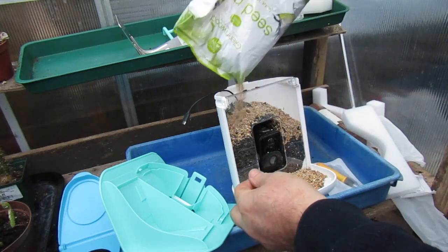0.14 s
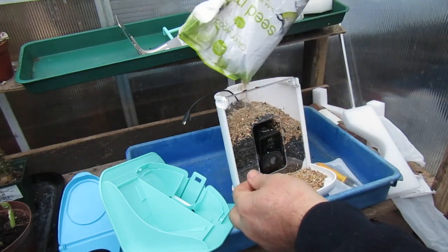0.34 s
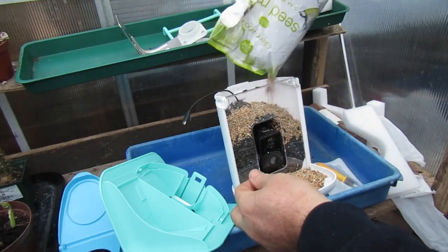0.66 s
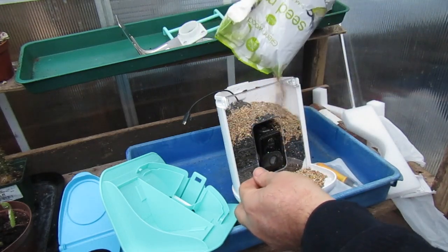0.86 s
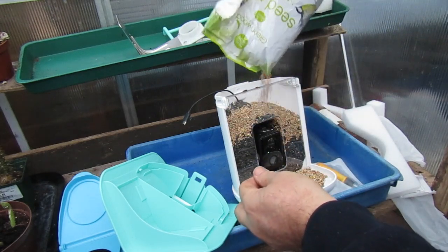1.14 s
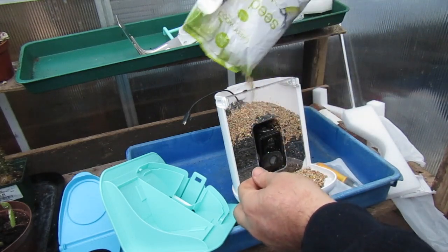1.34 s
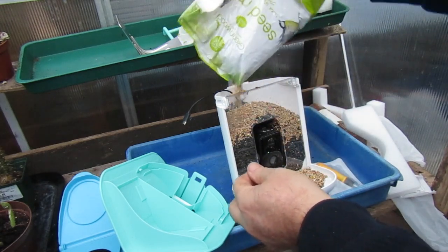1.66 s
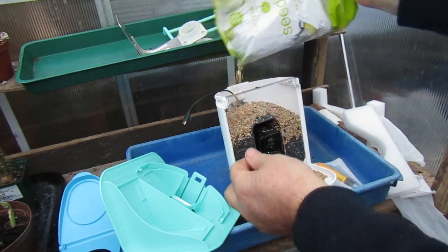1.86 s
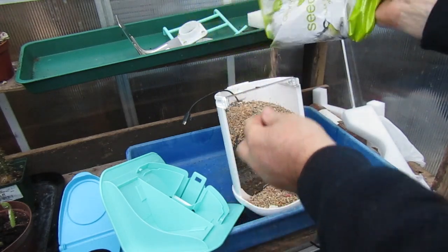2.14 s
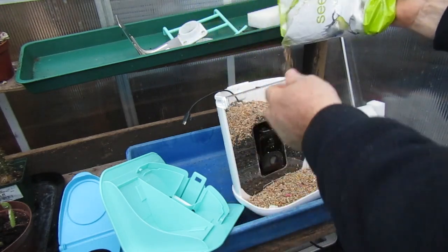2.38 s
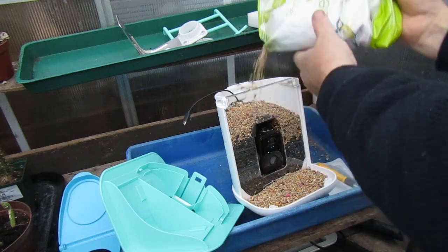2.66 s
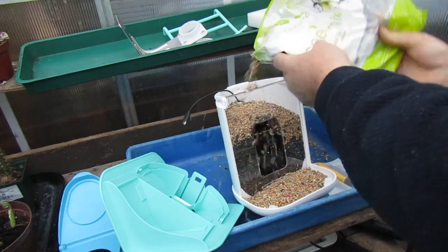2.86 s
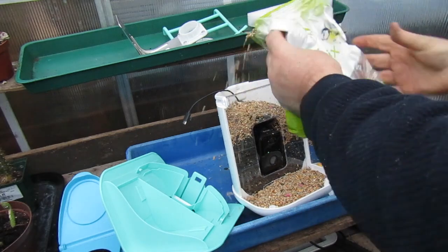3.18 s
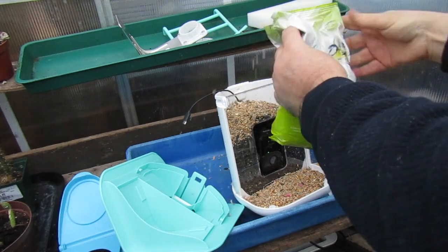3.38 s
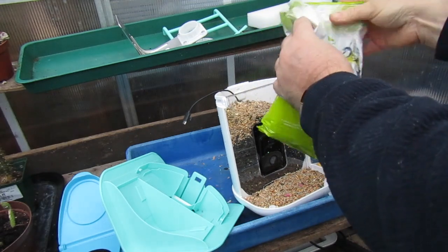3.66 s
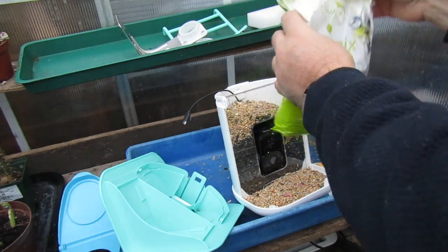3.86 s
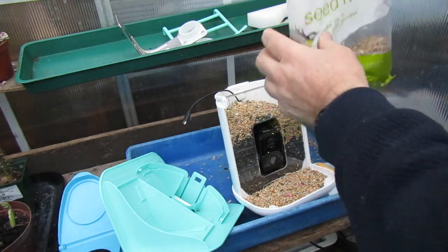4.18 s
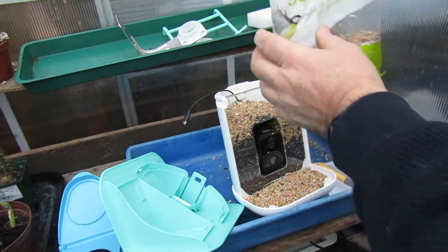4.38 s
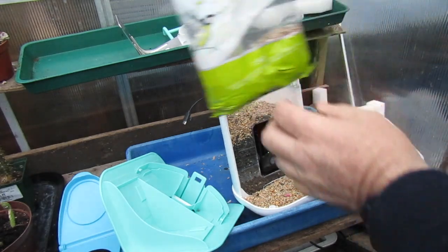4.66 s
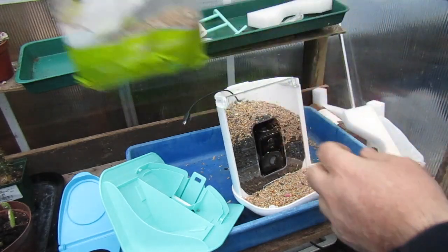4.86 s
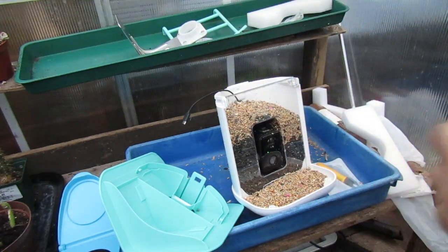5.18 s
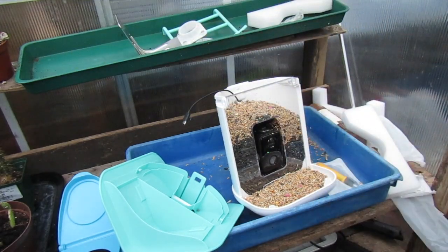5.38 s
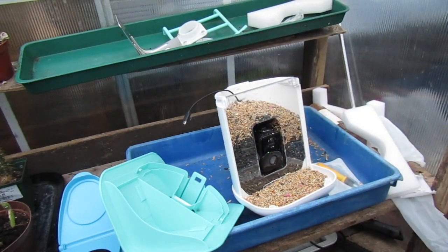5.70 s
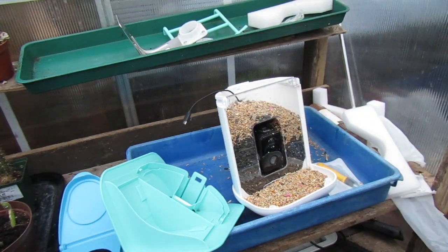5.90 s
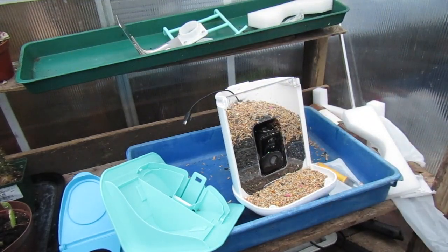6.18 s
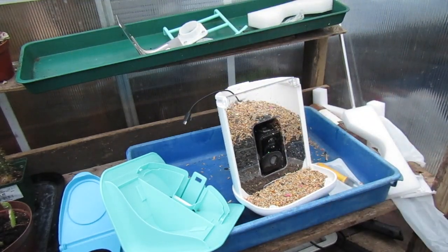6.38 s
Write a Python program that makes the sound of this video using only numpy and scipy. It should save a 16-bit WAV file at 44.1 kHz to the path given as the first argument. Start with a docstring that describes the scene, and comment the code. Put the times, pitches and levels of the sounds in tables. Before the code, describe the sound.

Close, loud plastic bag rustling and dull bumps over a hissing seed pour that stops, leaving scattered crisp film snaps in a greenhouse.

```python
"""Small seeds pour from a plastic bag into a plastic hopper in a greenhouse; then the bag is lifted, squeezed
and carried off. Seeds are dense random grains, clumped and sent through wall and hopper resonances.
The bag film buckles in snaps (click, rebounds, ring) and crunches (bursts of creases in three bands).
Hands and the seed load thump dully as noise pushes ring the walls; a low wavering sine hum swells now and then.
Shaped noise makes the air, and a short, slightly dull tail the greenhouse."""
import sys
import numpy as np
from scipy import signal
from scipy.fft import rfft, irfft, next_fast_len
from scipy.io import wavfile

SR = 44100
rng = np.random.default_rng(int(sys.argv[2]) if len(sys.argv) > 2 else 0)


def inscribe(sig):
    """Save sig as 16-bit PCM at rate SR to the path in sys.argv[1].

    A 1-D sig is mono; a 2-D sig holds one channel per row.
    Samples are clipped to [-1, 1] before scaling.
    """
    pcm = np.round(np.clip(np.atleast_2d(sig).T, -1, 1) * 32767)
    wavfile.write(sys.argv[1], SR, pcm.astype(np.int16))


def boost_factor(decibels):
    """Convert a level in decibels to a linear amplitude factor."""
    exponent = np.asarray(decibels, float) / 20
    return 10 ** exponent


N = 288414

# Spectrum of the air. Each row: frequency in Hz, relative weight in dB.
AIR_SPECTRUM = [(20, -25), (40, 11), (100, 11), (300, 15.5), (1000, -26), (2500, -57), (8000, -76),
                (15000, -16)]
# Hum swells. Each row: start of the hold in seconds, end of the hold in seconds, mean level in dB.
HUM_SWELLS = [(.33, .48, -49), (1.382, 1.87, -48.5), (2.06, 2.42, -51)]
# Wall resonances. Each row: frequency in Hz, width in Hz, relative gain in dB.
WALL_MODES = [(95, 9.6, -13), (176, 23, -1), (325, 190, 3), (400, 72, -8)]
# Dull thumps of hand and load. Each row: start in seconds, peak in dB, pitch in Hz.
THUMPS = [(0.001, -10, 325), (0.387, -14.5, 384), (1.041, -12, 400), (1.07, -18, 314), (1.324, -17.5, 370),
          (1.861, -18, 375), (1.989, -11, 400), (2.421, -17, 502), (2.58, -15.5, 360), (2.795, -12.5, 310),
          (3.132, -20, 413), (4.103, -14.5, 305), (4.119, -14, 507), (4.256, -21, 760), (4.437, -15.5, 567),
          (4.4745, -16, 783), (4.485, -18.5, 975), (5.443, -17, 700), (6.199, -22, 325)]
# Load slumps, bag drums and slackens. One row: start in seconds, nominal level in dB, first mean pitch in Hz,
# last mean pitch in Hz, length in seconds.
SLUMP = (4.484, -22, 390, 290, .12)
# Runs of creases. Each row: start in seconds, grain level in dB, tilt from low to top band in dB, T60 in seconds.
CRUNCHES = [(0.0747, -15, -11, 0.064), (0.157, -10.5, 1, 0.074), (0.255, -12.5, -16, 0.097),
            (0.299, -9.5, -10, 0.13), (0.3884, -12, -5, 0.15), (0.4632, -8.5, -7, 0.068),
            (0.526, -15.5, -9, 0.18), (0.6026, -10.5, -15, 0.054), (0.666, -12, -7, 0.081),
            (0.7473, -11.5, -9, 0.061), (0.8954, -8.5, 7, 0.018), (1.044, -7.5, 1, 0.05),
            (1.144, -16.5, 4, 0.061), (1.194, -9.5, -5, 0.06), (1.242, -20.5, -19, 0.37),
            (1.292, -9, -13, 0.14), (1.3549, -8, -10, 0.052), (1.4195, -13.5, -2, 0.061),
            (1.518, -14, 9, 0.1), (1.864, -4, -13.5, 0.081), (1.894, -7, 19, 0.06),
            (1.9607, -14.5, 18, 0.089), (1.986, -10, -14.5, 0.14), (2.0804, -9, 8, 0.22),
            (2.1313, -4, 17, 0.046), (2.2146, -3, 4, 0.12), (2.234, -6.5, 22, 0.15), (2.252, -8, 16, 0.12),
            (2.452, -11, 33, 0.065), (2.469, -11.5, 38, 0.17), (2.491, -12, 33, 0.093),
            (2.534, -12, 22, 0.11), (2.5605, -6.5, 31, 0.05), (2.586, -8.5, 38, 0.051),
            (2.874, -10, 16, 0.067), (2.889, -9, 16, 0.046), (2.9519, -8, 2, 0.089), (3.049, -7, 19, 0.056),
            (3.195, -9.5, 27, 0.051), (3.216, -4, 5, 0.052), (3.229, -5, 20, 0.031),
            (3.273, -10, 20, 0.037), (3.3027, -9.5, 18, 0.058), (3.352, -15, 32, 0.078),
            (3.488, -12, 7, 0.22), (3.639, -8, 14, 0.027), (3.66, -8, 1, 0.079), (3.891, -9.5, 18, 0.048),
            (3.934, -10, -2, .05), (3.951, -5, 11, 0.04), (3.988, -6.5, 17, 0.054), (4.1, -12, -5, 0.092),
            (4.116, -5.5, -1, 0.083), (4.2, -12, 3, 0.2), (4.601, -20, -17.5, 0.13), (4.694, -19, 0, 0.093),
            (4.764, -16.5, 14, 0.044), (4.847, -17, -15, 0.11), (4.892, -16.5, 0, 0.06),
            (4.9638, -21, -22.5, 0.061), (5.1728, -14, 12, 0.087), (5.442, -8, -8, 0.024),
            (5.8384, -14, -16.5, 0.091), (5.989, -24, 13, 0.028), (6.0127, -17.5, 0, 0.17),
            (6.0559, -9.5, -3, 0.15), (6.163, -8.5, -14, 0.043), (6.1933, -9, -13.5, 0.097),
            (6.2585, -12, -9, 0.038), (6.486, -24.5, -19.5, 0.21)]
# Single sharp buckles. Each row: start in seconds, peak in dB, ring pitch in Hz, ring peak over click peak in dB.
SNAPS = [(1.2965, -4, 2200, 1), (1.4194, -10.5, 3200, 1), (1.864, -9.5, 2820, 2), (1.8947, -4, 1380, -4.5),
         (2.1315, -14, 2560, -11), (2.3077, -7, 1900, 8), (3.4867, -5, 2440, 4), (3.489, -3.5, 4360, 5),
         (3.8958, -4, 5550, -4), (3.989, -3, 4760, -6), (4.1259, 3, 3040, -9), (4.1555, -4, 2010, -11),
         (4.2165, -11, 2940, 0), (4.3337, -8, 3190, -11), (4.4752, -17, 1520, -2),
         (4.6024, -11, 1830, -4.5), (4.6953, -16, 6700, 4), (4.764, -9, 1600, -7), (4.8472, -8, 2830, -22),
         (4.894, -4.5, 3010, -8), (4.9031, 1.5, 5960, -14), (5, -13, 3760, -21), (5.0763, -11.5, 1540, -17),
         (5.1125, -17.5, 2850, 5), (5.163, -7.5, 2860, -10), (5.1814, 1.5, 2010, -7), (5.214, -10, 6170, 1),
         (5.2303, -4, 2980, -5), (5.2747, -8, 5130, -11), (5.302, -8.5, 2420, -4),
         (5.3315, -5.5, 1570, -8.5), (5.3517, 1, 8040, -7), (5.386, -20, 4000, -2),
         (5.3894, -1.5, 3200, -17), (5.3986, -14, 5500, -3), (5.411, 1.5, 6600, -5.5),
         (5.438, -20, 2000, 1), (5.4443, -11, 1540, -2), (5.457, -4, 6960, -7), (5.464, -7, 1500, -8),
         (5.4717, -12, 1550, -20), (5.487, -13, 1380, -6.5), (5.4971, 3, 2640, -17), (5.508, -19, 3000, 6),
         (5.5528, -27, 1400, -5), (5.5688, -1.5, 4400, -8.5), (5.741, -7, 1500, -15),
         (5.823, -17, 1660, -7), (5.841, -6, 1660, -5), (5.8518, -10.5, 1800, -1), (5.8744, 4, 2840, -7),
         (6.0895, -10, 4500, 0), (6.134, -7.5, 2370, -4), (6.2012, -14, 1300, -5),
         (6.2225, 3.5, 3550, -33.5), (6.3065, -18, 2600, 0), (6.328, -9.5, 3680, -1.5),
         (6.3799, -1, 3760, -18), (6.429, -14.5, 1980, -7)]
# Seed stream and rustle. Each row: time in seconds, hollow patter level in dB, treble hiss level in dB.
SEED_FLOW = [(0, -26, -36), (.2, -34, -41.5), (.45, -28, -41), (.64, -33, -42), (.8, -31.5, -26),
             (1.0, -32, -40.5), (1.4, -34, -48), (1.7, -33.5, -34.5), (1.82, -33.5, -42.5),
             (2.1, -26.5, -30.5), (2.3, -31, -20), (2.58, -27.5, -16), (2.7, -34.5, -23),
             (2.87, -27, -22.5), (3.03, -29.5, -20), (3.15, -22, -22), (3.3, -26, -25.5), (3.5, -22.5, -24),
             (3.72, -25.5, -27), (3.85, -20.5, -29), (4.04, -23.5, -24), (4.18, -31.5, -46),
             (4.29, -35, -45), (4.45, -39.5, -47), (4.58, -42.5, -62), (4.9, -39.5, -45), (5.06, -36, -62),
             (5.4, -36, -41.5), (5.55, -42, -74), (5.96, -40.5, -63), (6.1, -33.5, -39), (6.3, -40, -44),
             (6.54, -38, -87)]
# Hopper resonances. Each row: frequency in Hz, width in Hz, relative gain in dB.
HOPPER_MODES = [(674, 230, -30), (1020, 27, 14.5), (1370, 670, 1)]
# Spectrum of the patter. Each row: frequency in Hz, relative weight in dB.
PATTER_SPECTRUM = [(200, -20), (450, -8), (650, 2.5), (1100, -1), (2000, -4.5), (3000, -6), (5000, -15)]
# Spectrum of the hiss. Each row: frequency in Hz, relative weight in dB.
HISS_SPECTRUM = [(3530, -52), (6000, -22.5), (8720, -14), (11900, -15), (15000, -21.5), (16000, -60)]

AIR_DB = -50.5
HUM_HZ, HUM_REST_DB = 48.3, -73
HUM_RISE_DB_PER_S, HUM_FALL_DB_PER_S = 130, 140
ROOM_T60_S, ROOM_DB = 0.089, -18
THUMP_RING_WIDTH_HZ, THUMP_PUSH_S, THUMP_SETTLE_S = 30, 0.0039, 0.010
THUMP_PUFF_DB, THUMP_WALL_DB, THUMP_LOW_DB = 3, 3, -14.5   # against the ring
CRUNCH_LOW_DB, CRUNCH_TOP_DB = -6, -1.5   # grain level against the middle band at no tilt
CRUNCH_LOW_SHARE = 0.7   # share of the tilt taken by the low band
CRUNCH_DENSE_UNTIL_S = 4.3
PATCH_DB, PATCH_PITCH_RATIO, PATCH_LAG_PER_T60 = -5.5, 0.624, 0.18
SNAP_RING_T60_CYCLES = 8
SNAP_CREASE_DB, SNAP_CREASE_T60_S = -17, 0.039   # crease grains against the first click, before the filters
PATTER_REF_DB, HISS_REF_DB = -30, -32
RATTLE_AT_REF_DB, RATTLE_DB_PER_PATTER_DB, RATTLE_DB_PER_HISS_DB = -32.5, 0.55, 0.61
BOOM_AT_REF_DB, BOOM_DB_PER_PATTER_DB, BOOM_SINK_DB_PER_S = -34.5, 0.42, 1.98
HUSK_DB, HUSK_FLURRY_DB, HUSK_Q = 3, 5.5, 8   # against the plain rattle; swing; pitch over width
NOTCH_HZ, NOTCH_WIDTH_HZ = 7900, 260
BASS_HZ, TOP_HZ, EDGE_HZ = 46, 11040, 15000


def rms_one(x):
    """Scales to rms 1."""
    return x / np.sqrt(np.mean(x ** 2) + 1e-20)


def in_time(rows):
    """Interpolates table columns over the scene."""
    s, *columns = np.transpose(rows)
    return [np.interp(np.arange(N) / SR, s, column) for column in columns]


def band(x, low_hz, high_hz, order=2):
    """Butterworth band-pass."""
    edges_hz = [low_hz, min(high_hz, .45 * SR)]
    return signal.sosfilt(signal.butter(order, edges_hz, "band", fs=SR, output="sos"), x)


def colour(x, points):
    """Weights the spectrum by a table of Hz and dB; rms 1."""
    size = next_fast_len(N)
    hz = np.maximum(np.arange(size // 2 + 1) * SR / size, 1)
    table = np.array(points)
    weight_db = np.interp(np.log(hz), np.log(table[:, 0]), table[:, 1])
    return rms_one(irfft(rfft(x, size) * boost_factor(weight_db), size)[:N])


def resonance(x, hz, width_hz):
    """Two-pole resonator with unit gain near its pitch."""
    r = np.exp(-np.pi * width_hz / SR)
    feedback = [1, -2 * r * np.cos(2 * np.pi * hz / SR), r * r]
    return signal.lfilter([(1 - r * r) / 2, 0, (r * r - 1) / 2], feedback, x)


def drift(corner_hz):
    """Noise through two equal low-pass poles, rms 1: a slow random wander."""
    r = np.exp(-2 * np.pi * corner_hz / SR)
    return rms_one(signal.lfilter([1], [1, -2 * r, r * r], rng.standard_normal(N + SR))[SR:])


def grains(per_s, spread_db, size=N):
    """Random clicks of either sign, a few much larger than the rest."""
    sizes = boost_factor(spread_db * np.minimum(rng.exponential(1, size), 5)) * rng.choice([-1, 1], size)
    return sizes * (rng.random(size) < per_s / SR) + 1e-18


def air():
    """Steady shaped noise, strongest in the bass."""
    return boost_factor(AIR_DB) * colour(rng.standard_normal(N), AIR_SPECTRUM)


def hum():
    """A low sine that swells, holds and sinks, wavering in level and pitch."""
    t = np.arange(N) / SR
    level_db = np.full(N, float(HUM_REST_DB))
    for start_s, end_s, hold_db in HUM_SWELLS:
        rise_db = HUM_RISE_DB_PER_S * np.maximum(start_s - t, 0)
        fall_db = HUM_FALL_DB_PER_S * np.maximum(t - end_s, 0)
        level_db = np.maximum(level_db, hold_db - rise_db - fall_db)
    phase = 2 * np.pi * np.cumsum(HUM_HZ * (1 + 0.019 * drift(9.7))) / SR
    return np.sqrt(2) * boost_factor(level_db + drift(6)) * np.sin(phase)


def greenhouse(x):
    """Close hard panes and trays: a dense, quickly dying and slightly dull tail."""
    t = np.arange(SR // 4) / SR
    tail = grains(5000, 0.71, size=len(t)) * boost_factor(-60 * t / ROOM_T60_S) * (t > .0015)
    tail = signal.lfilter([1], [1, -.3], tail)
    return signal.fftconvolve(x, tail / np.sqrt(np.sum(tail ** 2)))[:N]


def noise_push(t, time_s):
    """Noise under a pulse that peaks at time_s."""
    return rng.standard_normal(len(t)) * t * np.exp(-t / time_s)


def slump(t):
    """The drumming bag slackens: a fading sine sinks with unsteady pitch and level."""
    _, level_db, from_hz, to_hz, length_s = SLUMP
    glide_hz = from_hz + (to_hz - from_hz) * t / length_s
    glide_hz = glide_hz * (1 + .14 * drift(90)[:len(t)])
    envelope = np.maximum(1 - t / length_s, 0) ** 2 * (1 - np.exp(-t / .003))
    level = boost_factor(level_db + 3 * drift(90)[:len(t)])
    return level * envelope * np.sin(2 * np.pi * np.cumsum(glide_hz) / SR)


def thumps():
    """A soft blow: a short noisy push rings its own pitch with a dull puff; the settling load rings the walls."""
    size = 9000
    out, t = np.zeros(N + size), np.arange(size) / SR
    for s, peak_db, hz in THUMPS:
        push = noise_push(t, THUMP_PUSH_S)
        walls = sum(boost_factor(db) * resonance(noise_push(t, THUMP_SETTLE_S), wall_hz, width_hz)
                    for wall_hz, width_hz, db in WALL_MODES)
        thump = rms_one(resonance(push, hz, THUMP_RING_WIDTH_HZ))
        thump = thump + boost_factor(THUMP_PUFF_DB) * rms_one(band(push, 256, 1350))
        thump = thump + boost_factor(THUMP_WALL_DB) * rms_one(walls)
        thump = thump + boost_factor(THUMP_LOW_DB) * rms_one(band(push, 79, 350))
        at = round(s * SR)
        out[at:at + size] += boost_factor(peak_db) * thump / np.abs(thump).max()
    at = round(SLUMP[0] * SR)
    out[at:at + size] += slump(t)
    return out[:N]


def bag_crunches():
    """Many creases swell fast and die away; three bands colour them, ever larger patches ring lower in turn."""
    size = 7000
    low, mid, top, patches = np.zeros((4, N + size))
    t = np.arange(size) / SR
    for (s, level_db, tilt_db, t60_s), pick in zip(CRUNCHES, rng.random(len(CRUNCHES))):
        shape = (1 - np.exp(-t / (0.025 * t60_s))) * boost_factor(-60 * (t / t60_s) ** 1.056)
        # seeds sliding on the film fill the gaps between creases
        per_s = 9000 if s < CRUNCH_DENSE_UNTIL_S else 3500
        shape = shape * np.sqrt(9000 / per_s)   # keeps the power
        burst = grains(per_s, 3.32, size=size) * shape
        fine = grains(per_s, 3.16, size=size) * shape
        low_db = level_db + CRUNCH_LOW_DB - CRUNCH_LOW_SHARE * tilt_db
        top_db = level_db + CRUNCH_TOP_DB + (1 - CRUNCH_LOW_SHARE) * tilt_db
        at = round(s * SR)
        low[at:at + size] += boost_factor(low_db) * burst
        mid[at:at + size] += boost_factor(level_db) * burst
        top[at:at + size] += boost_factor(top_db) * (burst + fine) / np.sqrt(2)
        for k in range(3):
            hz = min(2000 * 2 ** (pick + tilt_db / 30) * PATCH_PITCH_RATIO ** k, 9000)
            lag = round(PATCH_LAG_PER_T60 * k * t60_s * SR)
            ticks = resonance(grains(2500, 3, size=size) * shape, hz, hz / 4)
            ticks = ticks * np.sqrt(20000 / hz)   # offsets the narrower width of low patches
            patches[at + lag:at + size] += boost_factor(level_db + PATCH_DB) * ticks[:size - lag]
    return (patches + band(low, 570, 1950) + band(mid, 1200, 7040) + band(top, 6540, 12200))[:N]


def bag_snaps():
    """A click and two quick rebounds of the film; the buckled patch rings briefly and small creases settle."""
    size = 2600
    settle = boost_factor(SNAP_CREASE_DB - 60 * np.arange(size) / SR / SNAP_CREASE_T60_S)
    out, chances = np.zeros(N + size), rng.random((len(SNAPS), 8))
    for (s, peak_db, hz, ring_db), chance in zip(SNAPS, chances):
        clicks = np.zeros(size) + 1e-18
        clicks[0] = 1
        clicks[int(5 + 14 * chance[0])] = .9 - 1.8 * chance[1]
        clicks[int(20 + 30 * chance[2])] = .5 * chance[3]
        creases = settle * grains(7000, 2.5, size=size)
        tick = band(clicks, 3100, 18200) + band(creases, 1150, 11100)
        ring_width_hz = np.log(1000) / np.pi * hz / SNAP_RING_T60_CYCLES
        ring = resonance(band(clicks, hz / 2, hz * 2), hz, ring_width_hz)
        # neighbouring patches ring too
        sides = sum(resonance(clicks, side_hz, side_hz / 5) * 3000 / side_hz
                    for side_hz in 1800 * 6 ** chance[4:7])
        tick = tick / np.abs(tick).max() + chance[7] / 2 * sides / np.abs(sides).max()
        snap = tick / np.abs(tick).max() + boost_factor(ring_db) * ring / np.abs(ring).max()
        at = round(s * SR)
        out[at:at + size] += boost_factor(peak_db) * snap / np.abs(snap).max()
    return out[:N]


def seed_clumps():
    """Clumps of seeds arrive at once and thin out; log level, zero mean, rms 1."""
    fade = boost_factor(-60 / (.09 * SR))   # 60 dB in 0.09 s, before the log
    clumps = np.log(1 + signal.lfilter([1], [1, -fade], np.abs(grains(90, 2.5))))
    return rms_one(clumps - clumps.mean())


def husks():
    """Husks and film patches ring briefly, each size in flurries of its own."""
    return sum(boost_factor(HUSK_FLURRY_DB * drift(7.6)) * rms_one(resonance(grains(170, 2.36), hz, hz / HUSK_Q))
               for hz in np.geomspace(1200, 7000, 9))


def seeds():
    """Seeds land in uneven clumps: the wall booms, the hopper rings hollow, the heap rattles dry and fine."""
    patter_db, hiss_db = in_time(SEED_FLOW)
    patter_over_db, hiss_over_db = patter_db - PATTER_REF_DB, hiss_db - HISS_REF_DB
    rattle_db = RATTLE_AT_REF_DB + RATTLE_DB_PER_PATTER_DB * patter_over_db
    rattle_db = rattle_db + RATTLE_DB_PER_HISS_DB * hiss_over_db
    # the walls boom less as the hopper fills
    boom_db = BOOM_AT_REF_DB + BOOM_DB_PER_PATTER_DB * patter_over_db - BOOM_SINK_DB_PER_S * np.arange(N) / SR
    # a heavy stream runs even, a thin one comes in lumps and ticks
    thinness = np.clip((-20 - rattle_db) / 16, .3, .9)
    clumps = thinness * seed_clumps()
    hits = grains(3000, 1.3)
    boom = rms_one(sum(boost_factor(db) * resonance(hits, hz, width_hz) for hz, width_hz, db in WALL_MODES))
    hollow = sum(boost_factor(db) * resonance(hits, hz, width_hz) for hz, width_hz, db in HOPPER_MODES)
    patter = rms_one(colour(hits, PATTER_SPECTRUM) + boost_factor(-12.5) * rms_one(hollow))
    # lone seeds and creases tick out of the mass
    strays = thinness ** 2 * rms_one(grains(260, 3.2))
    rattle = rms_one(band(rms_one(grains(3500, 2.77)) + boost_factor(-3) * strays, 1200, 5670))
    rattle = rms_one(rattle + boost_factor(HUSK_DB) * rms_one(husks()))
    hiss = colour(rms_one(grains(9000, 3.1)) + boost_factor(0.5) * strays, HISS_SPECTRUM)
    return (boost_factor(boom_db + 3.5 * clumps) * boom
            + boost_factor(patter_db + 3.73 * clumps) * patter
            + boost_factor(rattle_db + 3.56 * clumps) * rattle
            + boost_factor(hiss_db + 2.4 * clumps + 1.5 * drift(17)) * hiss)


def scene():
    """Sums the near sources, their room tail, the air and the hum; one channel."""
    near = seeds() + bag_snaps() + bag_crunches() + thumps()
    return (near + boost_factor(ROOM_DB) * greenhouse(near) + air() + hum())[None]


def low_pass(x):
    """Removes everything above the highest recorded frequency."""
    return signal.sosfilt(signal.butter(12, 16340, fs=SR, output="sos"), x)


def record(dry):
    """Narrow treble notch, bass and top roll-off, clipping at full scale, then a steep low-pass edge."""
    x = signal.lfilter(*signal.iirnotch(NOTCH_HZ, NOTCH_HZ / NOTCH_WIDTH_HZ, SR), dry)
    x = signal.sosfilt(signal.butter(2, [BASS_HZ, TOP_HZ], "band", fs=SR, output="sos"), x)
    x = np.clip(x, -1, 1)
    x = signal.sosfilt(signal.ellip(6, .5, 27, EDGE_HZ, fs=SR, output="sos"), x)
    mix = np.clip(x, -1, 1)
    return low_pass(mix)


dry = scene()
out = record(dry)
inscribe(out)
```